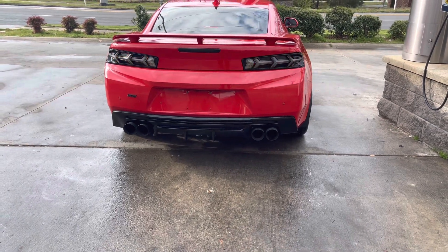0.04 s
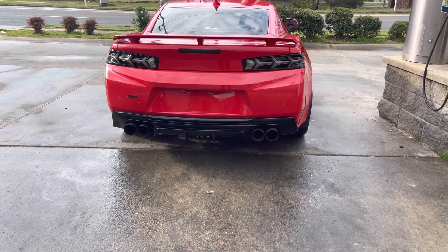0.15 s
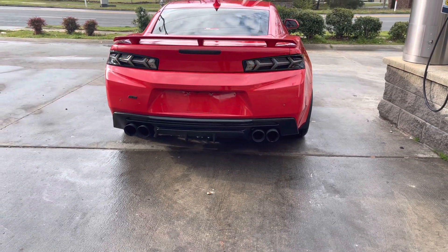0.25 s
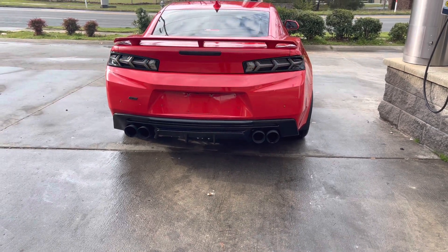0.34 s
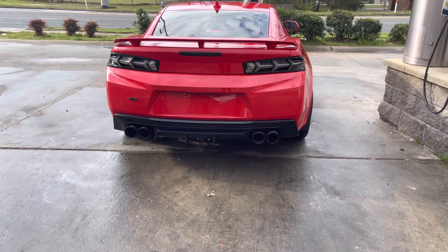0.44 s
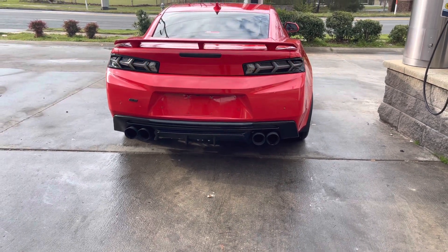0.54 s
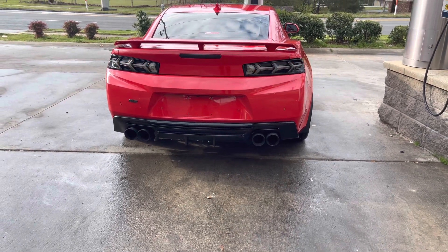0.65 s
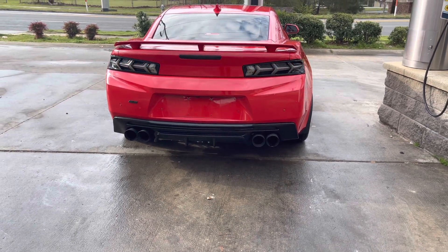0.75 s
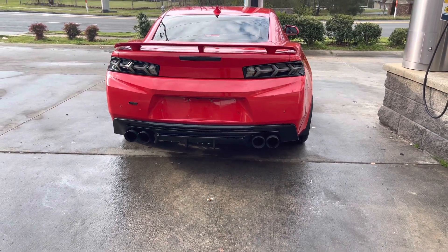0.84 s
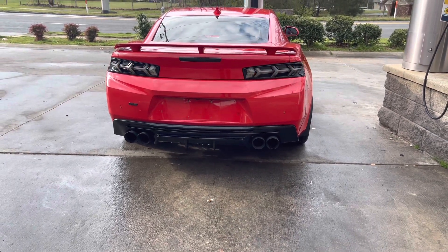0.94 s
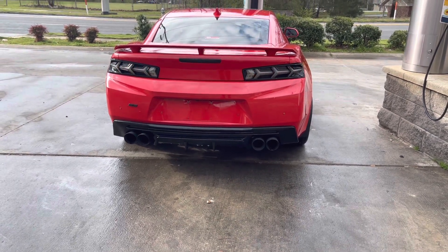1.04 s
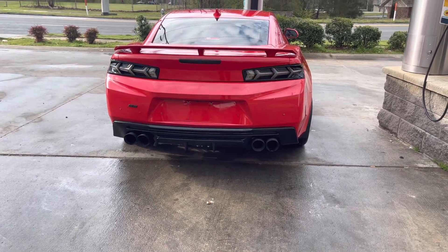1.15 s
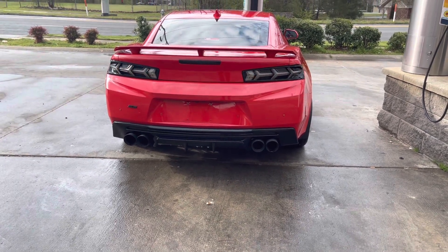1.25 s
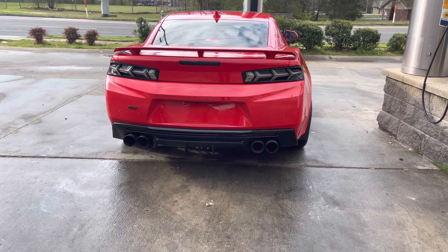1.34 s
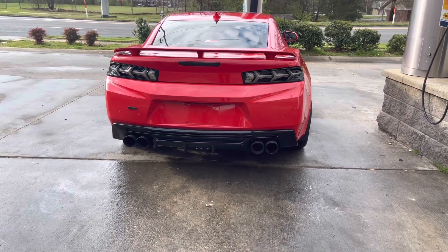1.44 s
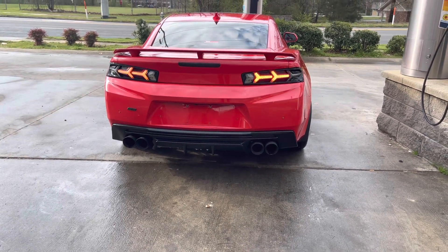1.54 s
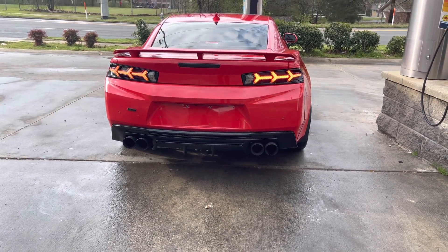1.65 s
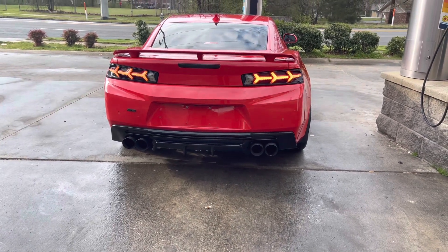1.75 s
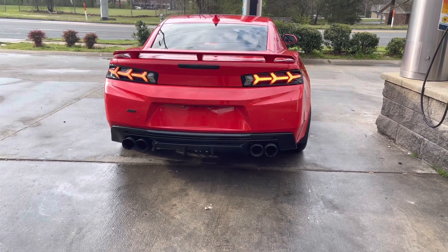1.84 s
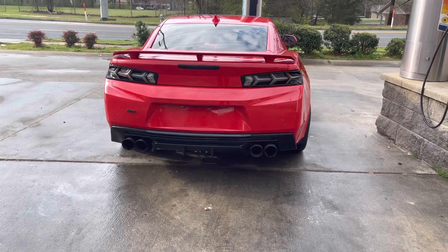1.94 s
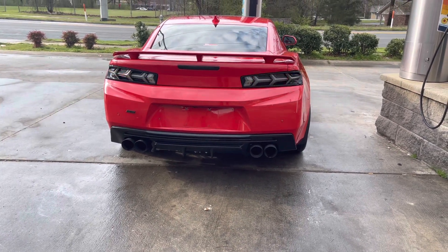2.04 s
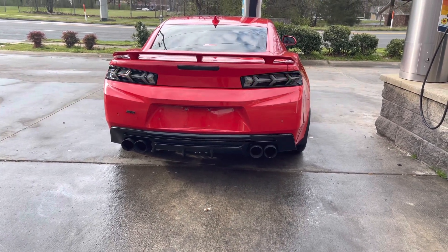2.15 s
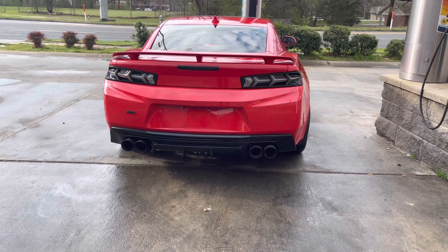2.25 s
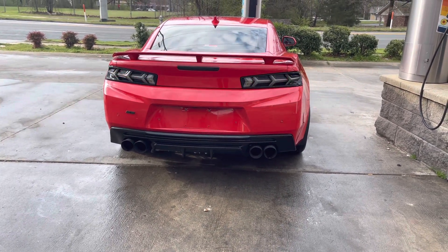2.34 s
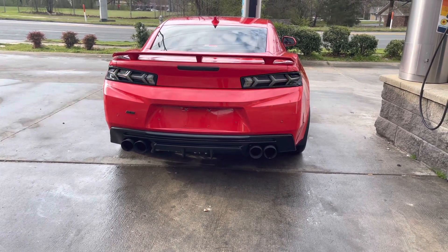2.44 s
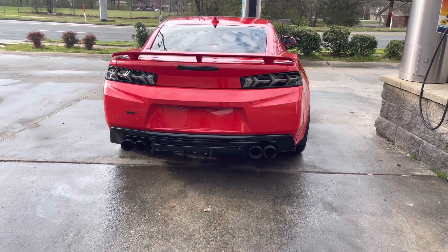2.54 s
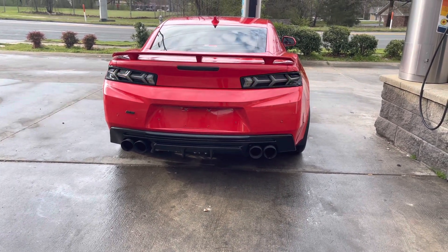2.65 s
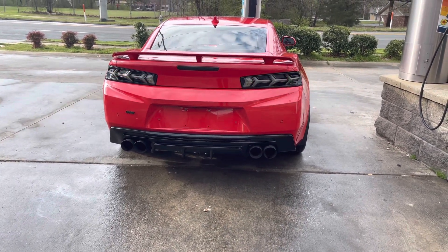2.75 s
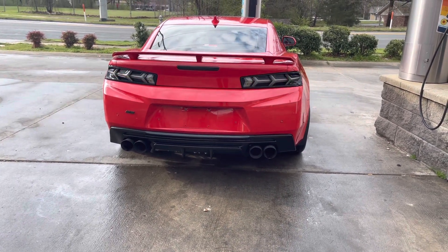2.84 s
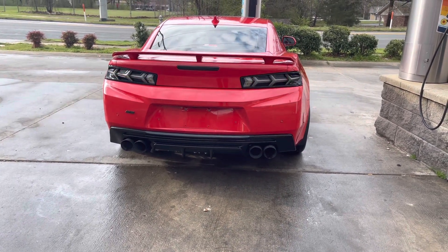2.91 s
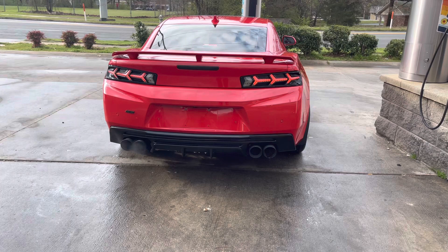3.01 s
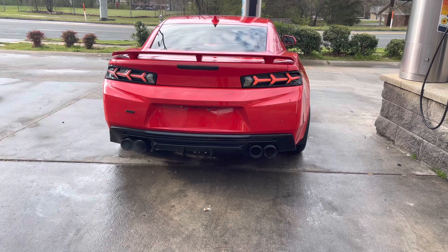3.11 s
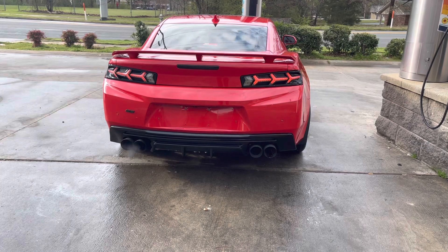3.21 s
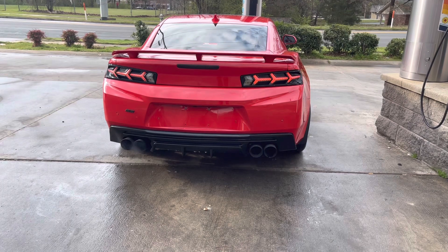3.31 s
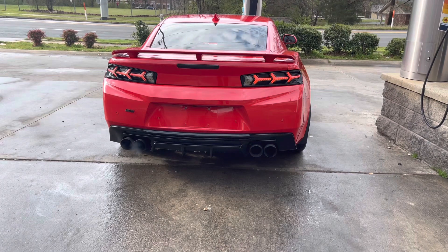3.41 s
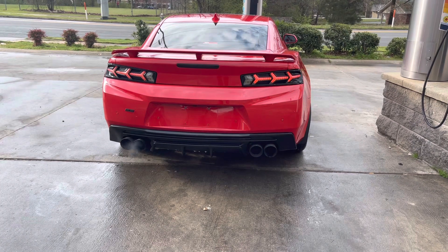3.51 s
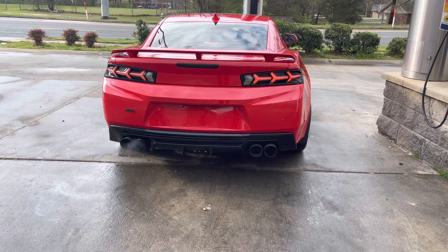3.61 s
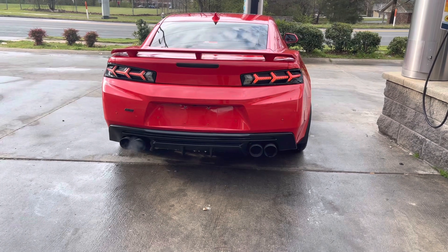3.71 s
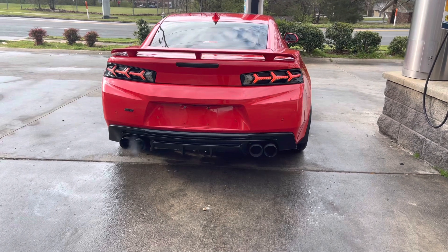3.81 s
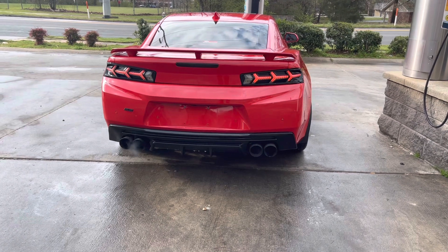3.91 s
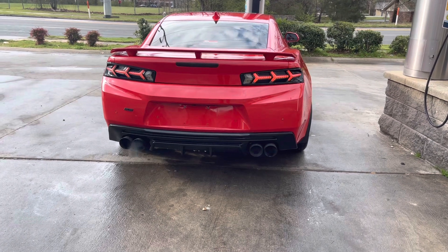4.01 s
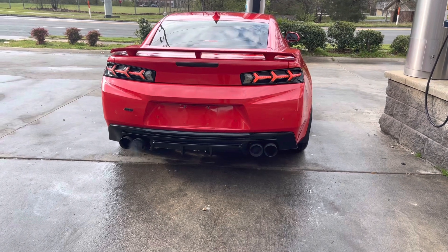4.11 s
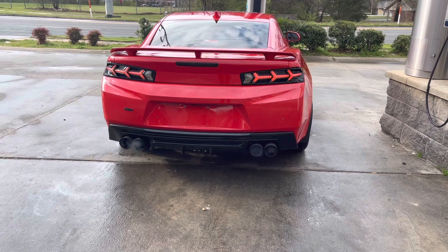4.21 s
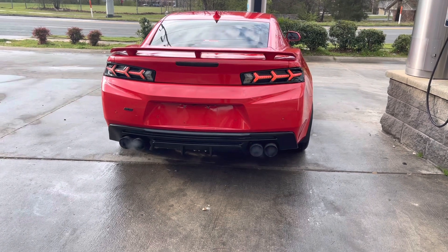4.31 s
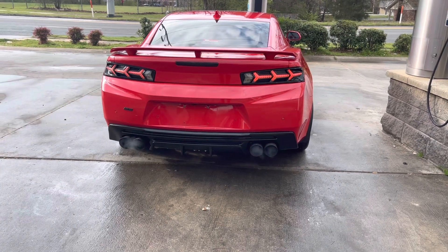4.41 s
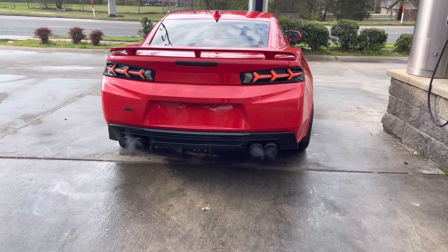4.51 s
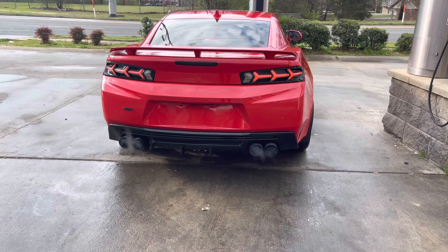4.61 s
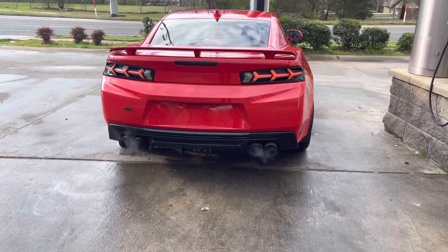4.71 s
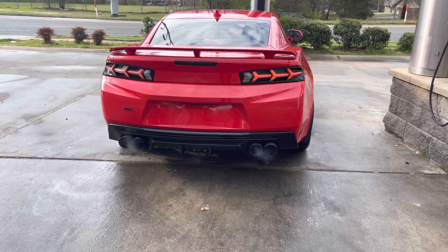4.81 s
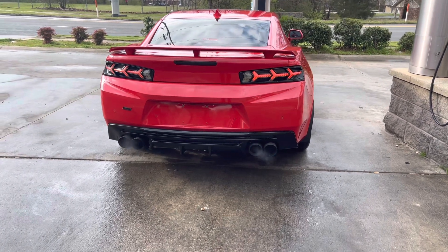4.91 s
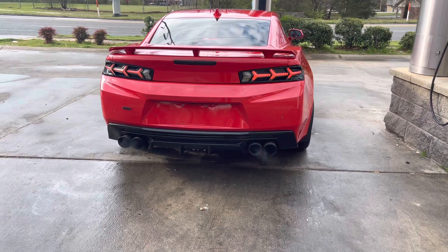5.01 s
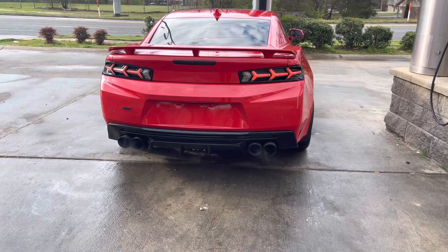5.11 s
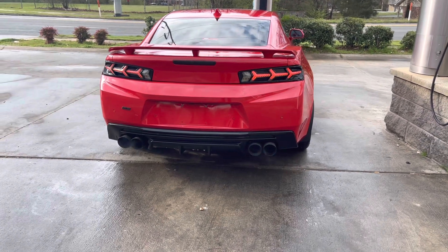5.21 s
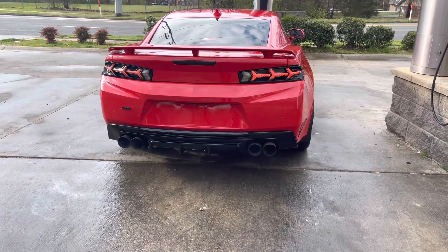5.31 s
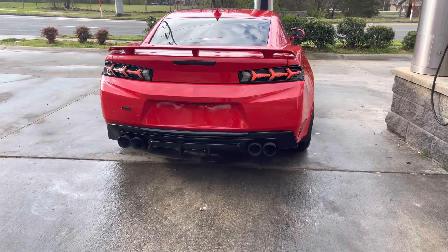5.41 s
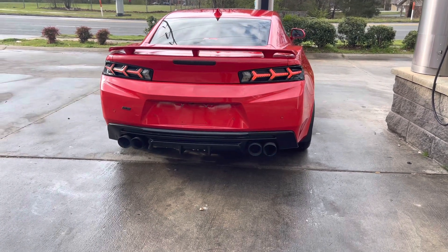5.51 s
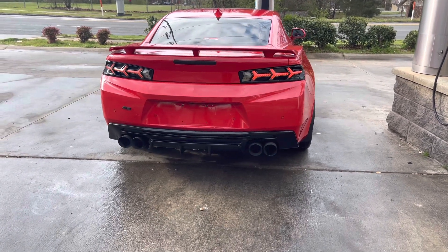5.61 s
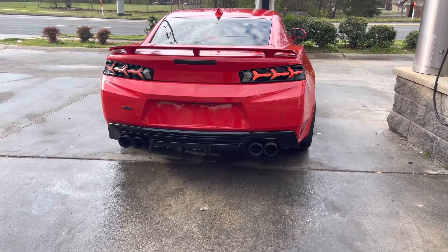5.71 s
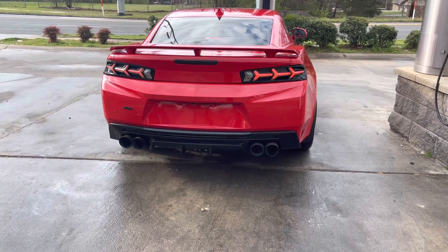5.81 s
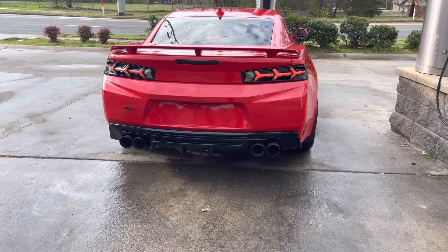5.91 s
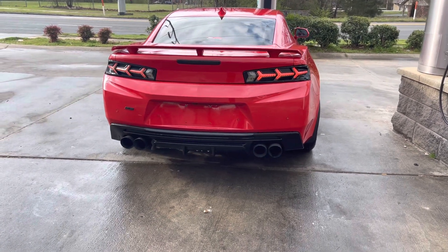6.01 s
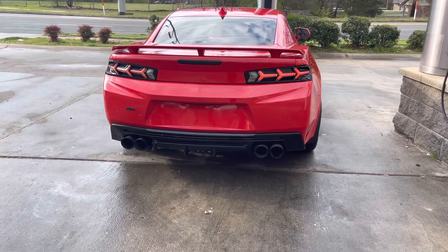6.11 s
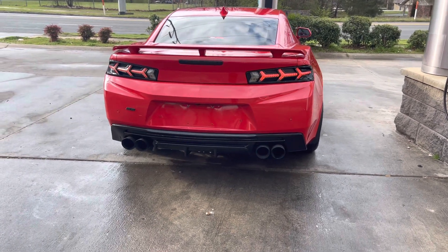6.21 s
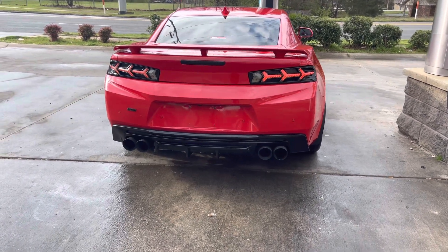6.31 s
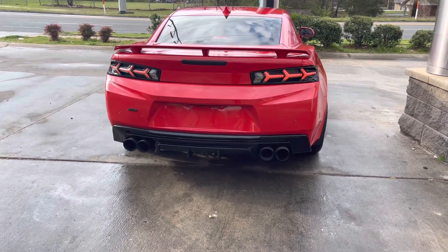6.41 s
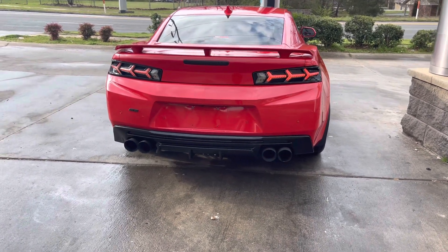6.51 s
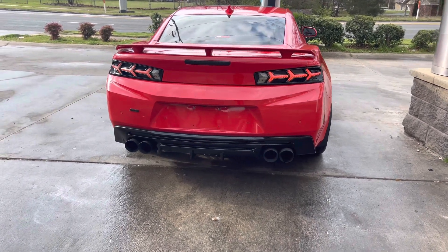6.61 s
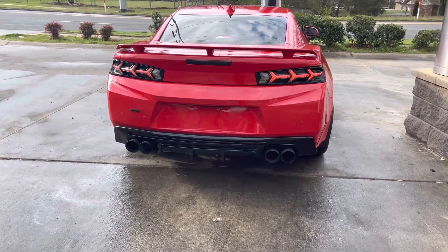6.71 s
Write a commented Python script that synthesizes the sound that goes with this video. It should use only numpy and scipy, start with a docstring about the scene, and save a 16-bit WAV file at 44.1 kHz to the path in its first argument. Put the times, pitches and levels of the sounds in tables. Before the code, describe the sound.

From behind a car in an open wash bay: soft road rumble and faint chirping first, then a spurt of water and steady bright hiss. A hard clack begins the ringing, pulsing starter grind. The engine bursts to life, barking and snapping through dual exhausts, howls briefly and drops into a thick, lumpy low idle with occasional faint pops, masking the fading background.

```python
"""Cold start of a V8 in a wash bay

A V8 sports car is started cold in an open wash bay, heard from behind its tailpipes. Over a shaped noise of
traffic, swept sines chirp as a bird and coloured noise hisses as a spray. The starter's clacks and grinding
are noise bursts that ring its housing. The engine catches with a bang and a crackle, flares and sinks to a
loping idle: uneven pulse trains ring two exhaust pipes, and gusts of noise rasp and hiss at their tips."""
import sys
import numpy as np
from scipy import signal
from scipy.fft import rfft, irfft
from scipy.io import wavfile
from scipy.ndimage import uniform_filter1d, minimum_filter1d

SR = 44100
rng = np.random.default_rng(int(sys.argv[2]) if len(sys.argv) > 2 else 0)


def generate_wav(signal):
    """Clip the signal to [-1, 1] and save it as 16-bit WAV at the path in sys.argv[1]."""
    frames = np.transpose(np.atleast_2d(signal))
    scaled = np.clip(frames, -1, 1) * 32767
    pcm = np.round(scaled).astype(np.int16)
    wavfile.write(sys.argv[1], SR, pcm)


N = 297675
TIME = np.arange(N) / SR   # s
BINS = np.maximum(np.fft.rfftfreq(N, 1 / SR), 1)   # Hz
CATCH_S = 2.8   # the engine begins to fire
RECEDE_S = 0.9   # time over which spray and traffic fade once it runs
LOPE_FROM_S, LOPE_GROWS_S = 3.35, 0.86   # the cylinders grow uneven as the flare ends


def from_db(db):
    """Level to amplitude: 20 dB is a factor of ten."""
    return np.exp(np.asarray(db) * (np.log(10) / 20))


def rms_one(x):
    """Normalization to unit mean power."""
    return x / np.sqrt(np.mean(x ** 2) + 1e-20)


def in_time(points):
    """Linear interpolation of a (time, value) curve at every sample."""
    time_s, value = np.transpose(points)
    return np.interp(TIME, time_s, value)


def over_hz(points):
    """Interpolation of a (frequency, value) curve over log frequency at every bin."""
    hz, value = np.transpose(points)
    return np.interp(np.log(BINS), np.log(hz), value)


def fade_in(start, length):
    """Linear ramp from 0 to 1; start and length in s."""
    return np.clip((TIME - start) / length, 0, 1)


def puff(start, decay, rise=0.0016):
    """Transient envelope: a short linear rise under an exponential decay, in s."""
    return fade_in(start, rise) * np.exp(-np.clip((TIME - start) / decay, 0, 20))


def clicks(times, sizes):
    """Impulse train: single-sample kicks at the given times."""
    places = np.round(np.asarray(times) * SR).astype(int)
    return np.bincount(np.clip(places, 0, N - 1), sizes, N)


def decaying(x, decay):
    """First-order relaxation: each kick dies away exponentially, with a time constant in s."""
    return signal.lfilter([1], [1, -np.exp(-1 / (decay * SR))], x)


def cut(x, hz, kind, order=2):
    """Butterworth filtering: a maximally flat passband."""
    return signal.sosfilt(signal.butter(order, hz, kind, fs=SR, output="sos"), x + 1e-18)


def noise(spectrum):
    """Partial coherence: mid and side noise mixed to a given likeness of the two channels, rms 1."""
    # the two channels: (frequency [Hz], correlation [1])
    likeness = [(60, .998), (250, .98), (600, .92), (2000, .9), (5000, .9), (9000, .94)]
    mid, side = rfft(rng.standard_normal((2, N)))
    alike = np.clip(over_hz(likeness), 0, 1)
    pair = np.sqrt(1 + alike) * mid + np.sqrt(1 - alike) * side * [[1], [-1]]
    lowest_hz, highest_hz = spectrum[0][0], spectrum[-1][0]
    # the colour falls away outside its table
    low_skirt = 1 / (1 + (.8 * lowest_hz / BINS) ** 6)
    high_skirt = 1 / (1 + (.8 * BINS / highest_hz) ** 6)
    return rms_one(irfft(pair * low_skirt * high_skirt * from_db(over_hz(spectrum)), N))


def resonances(x, modes):
    """Modal superposition: two-pole resonators in parallel with alternating signs."""
    out = 0
    for k, (hz, width, db) in enumerate(modes):
        r = np.exp(-np.pi * width / SR)   # pole radius from bandwidth
        zeros = np.array([1, 0, -1]) * (1 - r * r) / 2
        poles = [1, -2 * r * np.cos(2 * np.pi * hz / SR), r * r]
        out = out + (-1) ** k * from_db(db) * signal.lfilter(zeros, poles, x + 1e-18)
    return out


def traffic():
    """Distant sources sum to steady noise, mostly low-pitched; it recedes once the engine runs."""
    # colour of the traffic: (frequency [Hz], relative spectral level [dB])
    rumble_colour = [(25, -34), (45, -13), (65, -3.5), (115, 0), (180, -9.5), (230, -4), (330, -20),
                     (480, -20), (720, -23.5), (1190, -27), (1950, -27.5), (2700, -38), (4000, -46),
                     (8000, -55.5)]
    start_db, change_db = -35, -3
    return from_db(start_db + change_db * fade_in(CATCH_S, RECEDE_S)) * noise(rumble_colour)


def bird():
    """Frequency modulation: thin gliding sines with a random waver and a fluttering amplitude."""
    # chirps: (time [s], length [s], start frequency [Hz], end frequency [Hz], level [dB])
    chirps = [(.005, 0.038, 6400, 7800, -59), (0.198, 0.037, 8800, 8400, -58),
              (0.215, 0.092, 7800, 4900, -59), (0.293, 0.054, 4430, 3930, -58),
              (0.364, 0.063, 6750, 7900, -62)]
    out = np.zeros(N)
    flutter = np.abs(rms_one(cut(rng.standard_normal(N), 65, "low")))
    waver_hz = 450 * rms_one(cut(rng.standard_normal(N), 300, "low"))
    for start, length, start_hz, end_hz, db in chirps:
        along = fade_in(start, length)
        hz = start_hz + (end_hz - start_hz) * along + waver_hz
        phase = 2 * np.pi * np.cumsum(hz) / SR
        out += from_db(db) * flutter * np.sin(np.pi * along) * np.sin(phase)
    return out


def spray():
    """Jet noise off to the left: part reaches the right channel late, part is incoherent there."""
    # colour of the jet: (frequency [Hz], relative spectral level [dB])
    jet_colour = [(1470, -1), (2500, -13.5), (2780, -6.5), (4560, -7), (4970, -6.5), (5810, -4.5),
                  (9060, 4.5), (9630, 0.5), (10200, -17), (11200, -0.5), (12500, -22), (16300, -47),
                  (22000, -120)]
    # spurts as the nozzle opens: (time [s], level [dB])
    spurt_levels = [(0.722, -30.5), (.747, -38)]
    leak_s, leak_db = 0.538, -51
    open_s, rise_s, spurt_decay_s = .722, 0.01, 0.03
    jet_db, swell_db, swell_s, fade_db = -47.5, 11, 1.22, -21
    lag_s, scattered = .00041, .6   # scattered: share of the right channel's power

    left, right = noise(jet_colour)
    direct = np.roll(right, round(lag_s * SR))
    right = np.sqrt(1 - scattered) * direct + np.sqrt(scattered) * noise(jet_colour)[1]
    leak = from_db(leak_db) * fade_in(leak_s, 0.079)
    spurts = sum(from_db(db) * puff(s, spurt_decay_s, rise_s) for s, db in spurt_levels)
    jet = fade_in(open_s, rise_s) * from_db(jet_db + swell_db * fade_in(open_s, swell_s))
    fade = from_db(fade_db * fade_in(CATCH_S, RECEDE_S))
    return (leak + spurts + jet) * fade * np.array([left, right])


def pipes(x, bank=0, octaves=0, muffler_hz=380):
    """Standing waves of one bank's pipe, driven differently as speed climbs, then the muffler's low-pass."""
    # modes: (frequency [Hz], width [Hz], level in first pipe [dB], in second [dB], slope [dB per octave of speed])
    pipe_modes = [(56.35, 4.47, -5, -5.5, -5), (89.1, 7.7, -12.5, -8.5, -9), (96.9, 13.2, -7.5, -5, -8.5),
                  (113.4, 21, -7, -4, -8), (137, 22, -16, -10, 2.6), (163.3, 21.4, -16, -17, -10),
                  (196, 10, -15, -19, 1), (228.4, 11.7, -13.5, -17.3, 3), (251.2, 30, -15.5, -17, -1.6),
                  (279.2, 21.4, -16.5, -18, 5.5), (297.5, 21.2, -21.5, -21, 5.5),
                  (333.6, 27, -25.5, -25.5, 5.5), (386.3, 13, -34.8, -37.5, 12.5),
                  (434, 17, -36, -40.4, 13)]
    waves = 0
    for k, (hz, width, *bank_db, db_per_octave) in enumerate(pipe_modes):
        drive = x * from_db(db_per_octave * octaves)
        waves = waves + (-1) ** k * resonances(drive, [(hz, width, bank_db[bank])])
    return cut(cut(waves, muffler_hz, "low", order=4), 40, "high", order=4)


def housing(x):
    """Modal ringing of the starter's housing; each mode swells and fades at random on its own."""
    # modes: (frequency [Hz], width [Hz], level before the swells [dB])
    housing_modes = [(1010, 22, -17), (1226, 22, -6), (1490, 10.5, 0), (1570, 16, -15), (2250, 5.8, 8),
                     (2358, 14, 3.5), (3160, 15, -1), (3710, 50, 0)]
    swell_db, shift_s = 7, .08   # furthest change either way, and time between new values
    moments = np.arange(0, TIME[-1], shift_s)
    swells = from_db(swell_db * rng.uniform(-1, 1, (len(housing_modes), len(moments))))
    return sum(resonances(x * np.interp(TIME, moments, swell), [mode])
               for mode, swell in zip(housing_modes, swells))


def starter(boom_hz=58, teeth_hz=135, ring_db=3.5):
    """Impact and load modulation: the pinion clacks in, gears grind harder at each compression, air is pumped."""
    # colours of grinding and clacks: (frequency [Hz], relative spectral level [dB])
    grind_colour = [(190, -34), (330, -1.5), (464, -0.5), (505, -5.5), (636, -6), (744, -7.5), (1210, -0.5),
                    (1600, -8), (1720, -16), (2190, -6), (2830, -14), (3740, -14.5), (4170, -24),
                    (6000, -13), (7800, -20), (13200, -120)]
    clack_colour = [(300, 6), (600, -6), (1300, -4), (2300, -1), (3000, -8), (5000, -11), (9000, 1.5),
                    (11000, -23)]
    # solenoid and gear teeth knocking: (time [s], level [dB], decay [s])
    knocks = [(2.041, -23, 0.019), (2.066, -29, 0.016), (2.083, -35, 0.02), (2.487, -33.5, 0.032),
              (2.612, -29, 0.033), (2.732, -29, 0.019)]
    # the starter labours at each compression: (time [s], grinding level [dB])
    compressions = [(2.07, -48), (2.17, -34.5), (2.319, -29), (2.489, -30), (2.61, -32), (2.725, -32.5)]
    rise_s, decay_s, grind_db = 0.022, 0.035, -43   # grind_db: between compressions
    pumping_db = -34.5
    boom_db, boom_from_s, boom_decay_s = -27.5, 2.32, 0.65   # once the crank is turning

    load = from_db(grind_db) + sum(from_db(db) * puff(s, decay_s, rise_s) for s, db in compressions)
    engaged = fade_in(2.06, 0.017) * (1 - fade_in(CATCH_S, 0.053))
    teeth = 1 + 0.057 * np.sin(2 * np.pi * teeth_hz * TIME)
    grind = load * teeth * noise(grind_colour)
    clack = noise(clack_colour) * sum(from_db(db) * puff(s, decay) for s, db, decay in knocks)
    air = from_db(pumping_db) * rms_one(pipes(rng.standard_normal(N)))
    boom_level = from_db(boom_db) * puff(boom_from_s, boom_decay_s, rise=0.022)
    boom = boom_level * np.sin(2 * np.pi * boom_hz * TIME)
    ring = from_db(ring_db) * housing(clack + engaged * grind)
    return clack + ring + engaged * (grind + air + boom)


def through_tips(spectrum, ring_db):
    """Resonance under turbulent flow: rushing gas, part of which rings in the tailpipe tips, rms 1."""
    # modes of the tips: (frequency [Hz], width [Hz], relative level [dB])
    tip_modes = [(721, 15, 4), (1105, 22, -10.5), (1208, 53, -5.5), (1373, 10, -1.5), (1439, 15, -2),
                 (1547, 22, -1), (1652, 23, 0), (2050, 29, -1), (2257, 31, -5), (2438, 37, 0),
                 (2547, 13, 1)]
    ringing = rms_one(resonances(noise(spectrum), tip_modes))
    return rms_one(noise(spectrum) + from_db(ring_db) * ringing)


def bangs(bark_gain_db=1.0, crack_gain_db=0.0, thump_gain_db=-2.0):
    """Impulsive excitation: rich burns bark and crack out of the tips and kick the pipes."""
    # hardest firings, loud at the catch, faint at idle:
    # (time [s], bark before gain [dB], crack before gain [dB], thump before gain [dB])
    hard_firings = [(2.805, -6, -28, -19), (2.831, 1, -1.5, -3), (2.86, -5, -1.5, -12),
                    (2.877, -8, -13, -2), (2.891, -3, -17, -1.5), (2.9, 1, -29, -22),
                    (2.909, -23, -2.5, -31), (2.919, -5, -12, -10), (2.954, -14.5, -13, -20),
                    (2.964, -26, -18, -32), (2.986, -17, -28, -20), (2.997, -16, -17, -14),
                    (3.008, -8.5, -17, -16), (3.018, -11, -16, -27), (3.08, -17, -17.5, -26),
                    (3.091, -1, -18, -24), (3.14, -24, -19, -31), (3.171, -8, -37, -13),
                    (3.691, -22, -59, -30), (3.778, -34, -33, -38), (4.215, -29, -51, -34),
                    (4.328, -31, -39, -33), (4.446, -26, -37, -23), (4.899, -37, -27.5, -34),
                    (5.294, -28, -28, -24), (5.344, -35, -28, -28), (5.562, -25, -29, -30),
                    (6.265, -31, -42, -42), (6.47, -31, -40, -30)]
    # colour of the blast: (frequency [Hz], relative spectral level [dB])
    blast_colour = [(400, 11), (560, -16), (700, -10.5), (1150, 2), (1500, -5), (1850, -15), (2400, 2),
                    (2900, -11), (3600, -1.5), (5000, -15), (9000, -12), (12500, -43)]
    rise_hz, decay_s, bark_top_hz = 350, 0.0035, 1630
    times, *levels_db = np.transpose(hard_firings)
    bark, crack, thump = [clicks(times, from_db(db)) for db in levels_db]
    bark, crack = decaying(cut(np.array([bark, crack]), rise_hz, "low", order=1), decay_s)
    burst = through_tips(blast_colour, ring_db=-7)
    bark = from_db(bark_gain_db) * bark * cut(burst, bark_top_hz, "low", order=4)
    crack = from_db(crack_gain_db) * crack * cut(burst, bark_top_hz, "high", order=4)
    # divide by the pipes' peak response to a unit kick
    unit_kick = np.abs(pipes(signal.unit_impulse(SR // 10))).max()
    return bark + crack + from_db(thump_gain_db) * pipes(thump) / unit_kick


def speed():
    """Rotation as firings per s, four to a turn: a flare rises and settles on a slowly sagging idle."""
    # slow wander about the flare and idle: (time [s], deviation [Hz])
    wander = [(2.8, -.2), (3.1, -.5), (3.55, .4), (3.75, -.7), (4.1, .55), (4.25, .2), (4.5, .3),
              (4.7, -.45), (5.1, -.7), (5.5, .8), (6.15, .3), (6.7, -.2)]
    catch_hz, sag_hz_per_s = 70.15, 4.45
    flare_hz, rise_s, settle_s = 84.9, .321, .524   # flare_hz: scale ahead of the rise and decay
    running_s = np.maximum(TIME - CATCH_S, 0)
    flare = flare_hz * (1 - np.exp(-running_s / rise_s)) * np.exp(-running_s / settle_s)
    return catch_hz - sag_hz_per_s * running_s + flare + in_time(wander)


def firings():
    """Phase accumulation: speed is integrated to a firing count, giving each firing's time and cylinder."""
    # cylinders in firing order: (relative pulse level [dB], lateness [firing intervals], relative rasp level [dB])
    cylinders = [(3.5, 0.1, 14), (2.55, 0.091, 12.5), (-0.7, 0.209, 14), (-4.5, 0.08, 4.5), (4, 0.082, 10),
                 (2, 0.1, 15.5), (-0.5, 0.31, 10), (-7, 0.15, 11.5)]
    crank_lead = 0.9   # share of a firing interval already turned as the engine catches
    fired = crank_lead + np.cumsum(speed() * (TIME >= CATCH_S)) / SR
    number = np.arange(1, int(fired[-1]) + 1)
    times = np.interp(number, fired, TIME)
    return fired, times, np.array(cylinders)[number % len(cylinders)].T


def stumble_db():
    """Gaussian level dip: the burn falters briefly just after catching."""
    centre_s, width_s, depth_db = 2.943, 0.014, -16
    return depth_db * np.exp(-((TIME - centre_s) / width_s) ** 2)


def exhaust(fired, times, pulse_db, lateness):
    """Source and resonator: uneven pulses ring each bank's pipe; speed adds a howl and a snarl."""
    # which of the two pipes each cylinder fires into, in firing order: (pipe [0 or 1])
    pipe_of_cylinder = [1, 0, 0, 1, 0, 1, 1, 0]
    # loudness of the note before surge and stumble: (time [s], level [dB])
    effort = [(2.88, 1.5), (3.05, -0.5), (3.25, -3.5), (3.45, -3), (3.75, -2.5), (3.9, -7), (4.25, -9.5),
              (4.6, -9), (4.9, -6.5), (5.6, -7), (6.1, -9), (6.6, -9)]
    flare_lope, idle_lope = 0.5, 1.0   # shares of the cylinders' unevenness
    burn_scatter_db, flare_extra_db = 0.7, 0.4   # spread of the burns at idle, and more in the flare
    jitter_s, pipe_delay_s = .00008, .00075
    pulse_area_s = .009   # pressure times duration of a pulse at 0 dB
    idle_hz = 58   # speed at which the levels per octave below hold
    howl_order, howl_db, howl_db_per_octave = 3, -43, 24   # order: multiple of the firing rate
    snarl_db, snarl_db_per_octave = -74.5, 41.5
    surge_spread_db, surge_hz = .6, 6   # the mixture surges a little over several firings

    lope_full_s = LOPE_FROM_S + LOPE_GROWS_S
    lope = np.interp(times, [LOPE_FROM_S, lope_full_s], [flare_lope, idle_lope])
    scatter_db = burn_scatter_db + flare_extra_db * (times < lope_full_s)
    strength, timing = rng.standard_normal((len(times), 2)).T
    lag = lope * lateness * np.gradient(times)   # gradient: the firing interval
    arrivals = times + pipe_delay_s + lag + jitter_s * timing
    sizes = pulse_area_s * SR * from_db(lope * pulse_db + scatter_db * strength)
    number = np.arange(1, len(times) + 1)
    banks = np.array(pipe_of_cylinder)[number % len(pipe_of_cylinder)]
    pulses = [clicks(arrivals, sizes * (banks == bank)) for bank in (0, 1)]

    octaves = np.log2(speed() / idle_hz)
    note = sum(pipes(pulses[bank], bank, octaves) for bank in (0, 1))
    howl_level = from_db(howl_db + howl_db_per_octave * octaves)
    howl = howl_level * np.cos(2 * np.pi * howl_order * fired)
    # the snarl slips past the muffler
    snarl_level = from_db(snarl_db + snarl_db_per_octave * octaves)
    snarl = snarl_level * cut(sum(pulses), [450, 850], "band")
    surge_db = surge_spread_db * rms_one(cut(rng.standard_normal(N), surge_hz, "low"))
    level = from_db(in_time(effort) + surge_db + .5 * stumble_db())
    return level * (howl - note - snarl)


def evened(x, window):
    """Automatic gain: power is held near 1 by a twice-smoothed running mean, window in s."""
    size = int(window * SR)
    power = uniform_filter1d(uniform_filter1d(x ** 2, size), size)
    return x / np.sqrt(np.abs(power) + 1e-3 * np.mean(x ** 2))


def gusts(times, db, decay, steady, rise_hz):
    """Pulsating flow: one decaying gust per firing on top of a steady flow, power near 1."""
    kicks = clicks(times, from_db(db))
    pulsation = decaying(kicks + 1e-18, decay)
    return evened(cut(pulsation, rise_hz, "low", order=1) + steady, 0.21)


def gas_flow(blast_db, flare_db, fall_db_per_s, idle_db):
    """Incoherent addition: blast, dying flare and an idle flow that slowly grows louder add in power."""
    hold_s, decay_s, idle_rise_db_per_s = 0.046, 0.0088, 4.5
    running_s = np.maximum(TIME - CATCH_S, 0)
    blast = from_db(blast_db) * np.exp(-np.clip((running_s - hold_s) / decay_s, 0, 20))
    flare = from_db(flare_db - fall_db_per_s * running_s)
    idle = from_db(idle_db + idle_rise_db_per_s * running_s)
    return np.sqrt(blast ** 2 + flare ** 2 + idle ** 2) * from_db(stumble_db())


def gas(times, cylinder_rasp_db):
    """Amplitude-modulated turbulence: each gust rasps in the tips and hisses at their lips."""
    # colours of rasp and hiss: (frequency [Hz], relative spectral level [dB])
    rasp_colour = [(500, -7.5), (640, -24), (740, -8.5), (900, -2), (1180, 5), (1520, -4.5), (1700, -12.5),
                   (1870, -10), (2100, 3), (2500, -3.5), (2850, -19), (3400, -5), (4500, -24.5),
                   (9000, -23.5)]
    hiss_colour = [(2500, -3.5), (3500, -7.5), (4400, 1), (5600, -2.5), (6800, -1), (7700, 3.5),
                   (9300, 3.5), (10200, -19), (11500, -7.5), (13000, -47)]
    scatter_db, catch_extra_db, rough_s = 2.1, .8, 0.9   # the first gusts crackle most unevenly
    spread_db = scatter_db + catch_extra_db * (times < CATCH_S + rough_s)
    rasp_luck_db, hiss_luck_db = spread_db * rng.standard_normal((len(times), 2)).T
    rasp_gusts = gusts(times - .002, cylinder_rasp_db + rasp_luck_db,
                       decay=0.012, steady=0.15, rise_hz=302)
    hiss_gusts = gusts(times + 0.0013, 0.8 * cylinder_rasp_db + hiss_luck_db,
                       decay=0.0058, steady=0.5, rise_hz=189)
    rasp = through_tips(rasp_colour, ring_db=-3) * rasp_gusts
    hiss = noise(hiss_colour) * hiss_gusts
    rasp_flow = gas_flow(blast_db=-20, flare_db=-21, fall_db_per_s=25.5, idle_db=-50.5)
    hiss_flow = gas_flow(blast_db=-17, flare_db=-26.5, fall_db_per_s=26, idle_db=-54.5)
    return rasp_flow * rasp + hiss_flow * hiss


def bay(x):
    """Early reflection: wall and canopy return the mids and highs from alternating sides."""
    # reflections: (delay [s], level [dB])
    reflections = [(.009, -11), (.021, -14), (.034, -43), (.052, -24)]
    bright, out = cut(x, 540, "high"), x.copy()
    for k, (delay, db) in enumerate(reflections):
        lag = int(delay * SR)
        out[k % 2, lag:] += from_db(db) * bright[k % 2, :-lag]
    return out


def microphones(x):
    """Interchannel level and phase differences: the car reaches the two ports unequally."""
    # level difference: (frequency [Hz], left minus right [dB])
    tilt = [(120, 0), (250, -.2), (600, 1.2), (1300, 1.2), (2500, .6), (5000, 2.1), (8500, .6),
            (12000, -.8)]
    # phase difference: (frequency [Hz], lead of the left [rad])
    lead = [(500, 0), (1900, -.1), (3200, .5), (5200, 0), (7000, 0), (7900, .6), (8800, -.2), (12000, 0)]
    half = from_db(over_hz(tilt) / 2) * np.exp(.5j * over_hz(lead))   # half to each side
    return irfft(rfft(x) * np.array([half, 1 / half]), N)


def scene():
    """Superposition: the car in the bay, over spray, a bird and traffic."""
    fired, times, (pulse_db, lateness, rasp_db) = firings()
    engine = exhaust(fired, times, pulse_db, lateness) + gas(times, rasp_db)
    car = fade_in(2.807, 0.0016) * engine + bangs() + starter()
    return microphones(bay(car)) + spray() + traffic() + bay(bird() * np.ones((2, 1)))


def record(dry):
    """Peak limiting and band limiting: a fast gain holds the highest peaks down and the top is cut."""
    limit, limiter_s, cutoff_hz = .88, .004, 12800   # limit: amplitude, full scale 1
    gain = np.minimum(1, limit / (np.abs(dry).max(axis=0) + 1e-9))
    size = int(limiter_s * SR)
    smooth_gain = uniform_filter1d(minimum_filter1d(gain, size), size)
    return cut(dry * smooth_gain, cutoff_hz, "low", order=16)


dry = scene()
out = record(dry)
generate_wav(out)
```